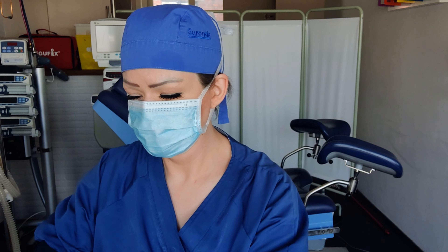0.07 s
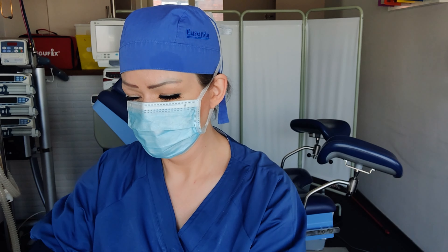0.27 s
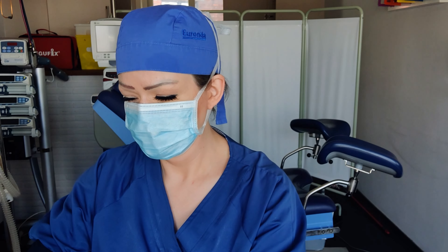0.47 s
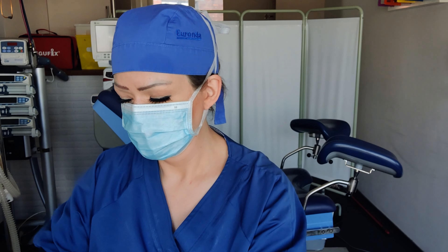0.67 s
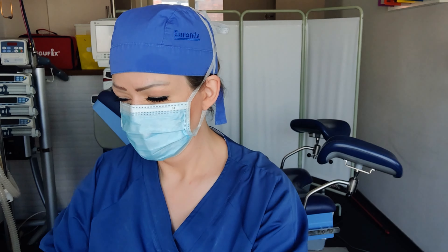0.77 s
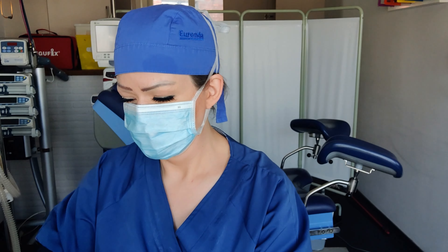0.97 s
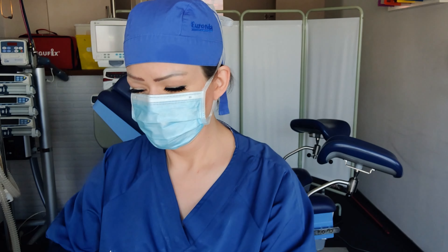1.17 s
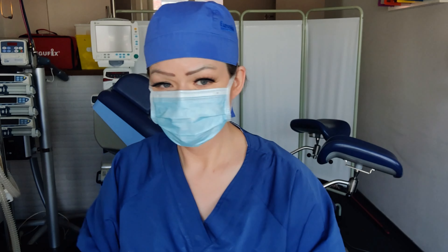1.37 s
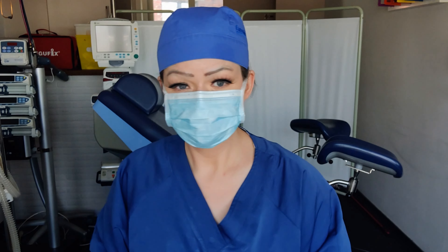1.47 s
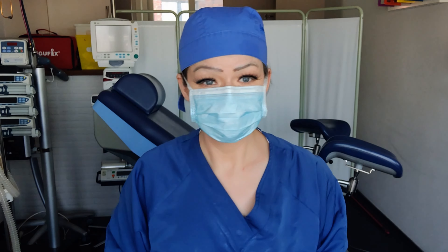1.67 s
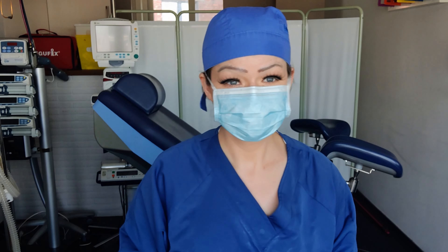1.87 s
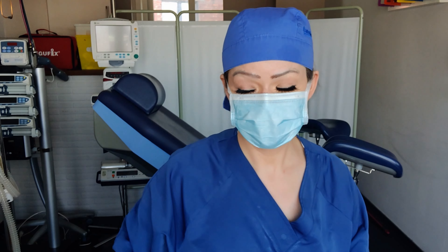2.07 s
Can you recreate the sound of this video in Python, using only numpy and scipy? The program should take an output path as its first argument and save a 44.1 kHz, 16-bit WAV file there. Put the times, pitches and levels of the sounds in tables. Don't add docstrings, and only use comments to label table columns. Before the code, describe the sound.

Crisp wrapper crumpling in dense snapping bursts stops abruptly, leaving faint cloth brushing and low hum

```python
import sys
import numpy as np
from scipy import signal
from scipy.fft import rfft, irfft, next_fast_len
from scipy.io import wavfile
from scipy.ndimage import map_coordinates

SR = 44100
rng = np.random.default_rng(int(sys.argv[2]) if len(sys.argv) > 2 else 0)


def log_audio(samples):
    frames = np.atleast_2d(samples).T
    limited = np.clip(frames, -1, 1)
    pcm = np.round(limited * 32767).astype(np.int16)
    wavfile.write(sys.argv[1], SR, pcm)


def decibels_to_gain(level_db):
    exponent = np.asarray(level_db, float) / 20
    return 10 ** exponent


N = 94109
TIME = np.arange(N) / SR


def unit(x):
    return x / np.sqrt(np.mean(x ** 2) + 1e-20)


def along(points, hz):
    f, v = np.transpose(points)
    return np.interp(np.log(hz + 1), np.log(f + 1), v)


def curves(rows):
    s, *columns = np.transpose(rows)
    return [np.interp(TIME, s, column) for column in columns]


def wobble(rate):
    knots = rng.standard_normal(int(N * rate / SR) + 4)
    return map_coordinates(knots, [np.arange(N) * rate / SR])


def filtered(x, response):
    m = next_fast_len(N + SR // 2)
    return irfft(rfft(x, m) * response(np.fft.rfftfreq(m, 1 / SR)), m)[..., :N]


def causal(x, spectrum):
    gain = np.maximum(decibels_to_gain(along(spectrum, np.fft.rfftfreq(4096, 1 / SR))), 1e-4)
    cepstrum = irfft(np.log(gain))
    cepstrum[1:2048] *= 2
    cepstrum[2049:] = 0
    pulse = irfft(np.exp(rfft(cepstrum)))
    return signal.fftconvolve(x, pulse / np.linalg.norm(pulse))[:N]


def rush(spectrum):
    # f/Hz, correlation/1
    alike = [(60, 0.93), (180, 0.99), (550, 0.35), (1650, 0.21), (4970, 0.16), (15000, 0.14)]

    def mid_and_side(hz):
        turn = np.arccos(np.clip(along(alike, hz), -1, 1)) / 2
        return decibels_to_gain(along(spectrum, hz)) * [np.cos(turn), np.sin(turn)]

    mid, side = filtered(rng.standard_normal((2, N)), mid_and_side)
    return unit(np.array([mid + side, mid - side]))


def spikes(rate, spread_db):
    chance, size, sign = rng.random(N), rng.exponential(size=N), rng.standard_normal(N)
    return unit((chance < rate / SR) * decibels_to_gain(np.minimum(spread_db * size, 9)) * sign)


def background():
    # t/s, level/dB
    rumble = [
        (0.0, -57.5),
        (0.1, -72),
        (0.23, -51.5),
        (0.34, -69),
        (0.36, -51),
        (0.52, -54.5),
        (0.7, -64.5),
        (1.65, -65),
        (1.72, -58.5),
        (2.13, -58),
    ]
    # f/Hz, density/dB per Hz
    lows = [(30, -39.5), (60, -12.5), (97, -10), (242, -3.5), (280, -8), (455, -19), (500, -32.5),
            (650, -55), (1100, -120)]
    # f/Hz, density/dB per Hz
    deep = [(12, -28), (20, -4.5), (45, -3.5), (70, -5.5), (95, -26), (200, -93)]
    # f/Hz, density/dB per Hz
    hiss = [(240, -36.5), (400, -8), (540, -16), (1100, -17), (4200, -28), (9000, -29), (13000, -29),
            (16000, -23.5)]
    # f/Hz, level/dB
    hum_tones = [
        (46, -71),
        (104, -68),
        (243, -72),
    ]
    # t/s, drone level/dB, second hum level/dB
    swell = [(0, -9, -3), (.4, 1, -6), (.47, 2, -8), (.65, 1.5, 2.5), (1.0, 2, 6.5), (1.2, -6, 1.5),
             (1.26, 8.5, 1), (1.42, 7.5, -5.5), (1.5, -6, -2), (1.6, 6.5, 3.5), (1.9, 5, -2), (2.0, -7, -5)]

    rumble_db, = curves(rumble)
    drone_db, second_db = curves(swell)
    sound = decibels_to_gain(rumble_db - 3.5 + 0.83 * wobble(9)) * rush(lows)
    sound += decibels_to_gain(-67 + 0.6 * drone_db) * rush(deep)
    sound += decibels_to_gain(-72.5 + 0.76 * wobble(3.3)) * rush(hiss)
    for (hz, db), swell_db in zip(hum_tones, (drone_db, second_db, 0)):
        phase = 2 * np.pi * hz * TIME + 0.73 * wobble(5.5)
        sound += decibels_to_gain(db + swell_db + 1.7 * wobble(8.02)) * np.sin(phase)
    return sound


def sleeve():
    # t/s, level/dB
    brushing = [(0.8, -79), (0.902, -82), (0.932, -71.5), (1.1, -72.5), (1.144, -87), (1.276, -81.5),
                (1.366, -72.5), (1.46, -72.5), (1.566, -67), (1.57, -66), (1.748, -71), (1.788, -62),
                (1.858, -61.5), (1.952, -69.5), (2.026, -67), (2.052, -66.5), (2.13, -67.5)]
    # f/Hz, density/dB per Hz
    cloth = [(240, -24.5), (400, -20), (620, -4.5), (2400, -9.5), (3300, -18), (6800, -19), (10000, -29.5),
             (16000, -29)]
    # t/s, length/s, level/dB, f/Hz, bandwidth/Hz
    strokes = [
        (1.575, 0.083, -74, 4300, 650),
        (1.4, 0.038, -73.5, 1700, 600),
        (1.796, 0.14, -65, 830, 300),
        (1.6, 0.23, -72, 1750, 410),
        (2, .11, -71, 2280, 160),
        (2.035, 0.043, -71, 2200, 1000),
        (1.282, 0.43, -74, 4900, 6200),
    ]

    brush_db, = curves(brushing)
    u = np.maximum(TIME - 1.574, 0) / 0.0053
    seam = 1 + 1.8 * u * np.exp(-u)
    sound = decibels_to_gain(brush_db + 1.15 * wobble(39.82) - 1.0) * seam * rush(cloth)
    for s, length, db, hz, wide_hz in strokes:
        u = np.maximum(TIME - s, 0) / length
        shape = (1 - np.exp(-u * 8)) * np.exp(-u ** 4)
        noise = rush([(20, 0), (16000, 0.0061)])
        fold = filtered(noise, lambda f: np.exp(-((f - hz) / wide_hz) ** 2))
        sound += decibels_to_gain(db) * shape * unit(fold)
    return sound


def pops():
    # t/s, peak level/dB, f/Hz, decay time t60/s
    bumps = [(.039, -40, 535, 0.068), (.039, -33.5, 1081, 0.043), (.212, -37.5, 646, 0.059),
             (0.231, -45.5, 98.5, 0.1), (.341, -39, 685, 0.043), (.361, -39, 205, 0.047),
             (.363, -36, 702, 0.041), (.41, -47.5, 220, 0.065), (.436, -45, 363, 0.1),
             (.438, -32.5, 1120, 0.071), (.44, -45, 120, 0.1), (.49, -48.5, 238, 0.07),
             (.508, -41.5, 706, 0.024), (.532, -37, 684, 0.057), (0.534, -41, 256, 0.05),
             (.545, -44, 565, 0.041), (.585, -56.5, 520, 0.075), (.66, -57, 394, .1),
             (2.08, -54, 241, 0.18), (1.491, -65, 255, 0.1), (1.671, -56, 200.4, 0.15),
             (1.71, -48.5, 160, 0.17)]
    s, db, hz, t60 = np.transpose(bumps)[..., None]
    since = np.maximum(TIME - s, 0)
    onset = 1 - np.exp(-since / t60 * 12)
    decay = decibels_to_gain(db + 4.5 - 60 * since / t60)
    return np.sum(decay * onset * np.sin(2 * np.pi * hz * since), axis=0)


def wrapper():
    # t/s, effort/dB, flexing of the sheet/dB, ring of the taut film/dB
    crumple = [(0.0, -38, -14, -7.5), (.1, -44.5, -8.5, -11), (0.14, -45, -8, -15.5),
               (0.186, -33, -8, -12.5), (.245, -38, -8, -6.5), (0.29, -44.5, -5.5, -13.5),
               (0.348, -38.5, -4, -5), (.4, -40.5, -4, -9), (0.422, -53, 4, -12), (0.43, -40.5, -6.5, -9.5),
               (0.596, -40.5, -8.5, -13.5), (0.7, -56, -12, -10)]
    # t/s, peak level/dB, thump of the sheet/dB, cluster length/ms, brightness/dB
    snaps = [(0.0238, -33, -18, 1.5, 2), (.0409, -18, -15.5, 2.73, -3), (0.0545, -29, -27.5, 0.82, -5),
             (.077, -36, -24, 2, -2), (0.1138, -23.5, -19.5, 2.1, -3.5), (0.1345, -28.5, -22, 3.3, 4.5),
             (0.1558, -20.5, -18.5, 3, 1), (0.1728, -18, -30, .5, 9), (0.178, -24.5, -31, 2.3, -6),
             (0.187, -19.5, -25.5, 4.1, -4.5), (.2062, -23.5, -18.5, 1.9, 7.5),
             (0.2182, -22, -22.5, 1.1, 8), (0.273, -24, -31.5, 2.2, 0), (0.2776, -21.5, -20, 2.4, -4),
             (0.3137, -20, -31, 1.63, -4.5), (0.326, -28, -33, 1.9, 11), (0.3418, -15.5, -34.5, 2, -5.5),
             (0.3638, -22, -18, 1.2, -3), (0.4321, -14.5, -23, 1.8, -2), (0.4357, -15.5, -23, 2.8, -1.5),
             (0.4392, -17, -18, 3.36, -1.5), (0.444, -22, -22, 6, -2), (.4531, -18.5, -28, 1.6, 4),
             (0.4862, -21, -27, 2, 4.5), (0.507, -21.5, -19.5, 3.6, -0.5), (0.5288, -23, -39, 0.81, 3.5),
             (0.5349, -18, -20, 4.4, -1), (0.584, -18, -21.5, 1.4, -1), (0.6456, -30.5, -18, 1.7, -1)]
    # t/s, peak level/dB, cluster length/ms, brightness/dB
    ticks = [(0.0459, -26, 1.8, -5), (0.059, -31.5, 1.6, 0.5), (.163, -29.5, 3.2, 1), (0.196, -24, 4.2, -3),
             (0.2122, -26, 1.2, -6), (0.221, -27.5, 1.4, -4), (0.226, -29, 1.4, -4.5),
             (.234, -29.5, 3.2, 2), (0.244, -28, 1.7, -1.5), (.285, -32.5, 1.6, -4), (0.31, -39, 1.3, 7),
             (.347, -21.5, 2, -4.5), (0.3513, -26.5, 1.1, 0.5), (0.3734, -27, 1.5, -2),
             (0.376, -28, 1.3, -4.5), (.388, -30.5, 5.5, -3), (.3948, -29, 1, 16), (.4488, -32, 1.5, 1.5),
             (0.4716, -34, 2, 1), (0.514, -25.5, 1.6, 5), (.518, -22.5, 2, 0), (0.543, -27, 4.3, -3.5),
             (0.58, -32, 1.6, -1), (.591, -27.5, 3, -3)]
    # f/Hz, density/dB per Hz
    film_colour = [(500, -35.5), (900, -3.5), (2000, -7), (5000, -2.5), (9000, -7), (13000, -6),
                   (16000, -6.5)]
    # f/Hz, density/dB per Hz
    edge_colour = [(500, -44.5), (1100, -6.5), (2200, 0), (5000, -2.5), (9000, -4), (16000, -5.5)]
    # f/Hz, density/dB per Hz
    taut = [(5600, -35), (6400, -5.5), (7100, 1), (7900, -3), (9000, -36.5)]
    # f/Hz, density/dB per Hz
    crack = [(800, -29.5), (2000, -19.5), (4800, -7), (6200, -5), (8500, -6.5), (11000, -7), (16000, -14.5)]
    # f/Hz, density/dB per Hz
    sizzle = [(4000, -39), (8000, -13.5), (11000, -3.5), (14000, -1.5), (17000, 0.5)]
    # f/Hz, density/dB per Hz
    sheet_colour = [(53, -34.5), (90, -20), (235, -4.5), (500, -3), (900, -2.5), (2200, -5), (4500, -22.5),
                    (8000, -54)]

    effort_db, flex_db, ring_db = curves(crumple)
    effort = decibels_to_gain(effort_db - 276 * np.maximum(TIME - 0.66, 0))

    def crinkle(colour):
        return causal(effort * decibels_to_gain(3.8 * wobble(119.8) - 7.0) * spikes(18000, 2), colour)

    def cluster(shape, grains):
        burst = shape * grains
        return burst * np.linalg.norm(shape) / np.linalg.norm(burst)

    buckles, slaps = spikes(30000, 0.76), spikes(12000, 1.9)
    cracks, thumps = np.zeros((2, N)), np.zeros(N)
    small = [(s, db, -26, ms, bright_db) for s, db, ms, bright_db in ticks]
    for s, db, thump_db, ms, bright_db in list(snaps) + small:
        u = np.maximum(TIME - s, 0) / np.clip(ms / 1000, 0.0004, 0.02)
        shape = (1 - np.exp(-u * 7)) * np.exp(-u * u)
        tilt_db = np.array([[-bright_db / 2], [bright_db / 2]])
        cracks += decibels_to_gain(db - 8.5 + tilt_db) * cluster(shape, buckles)
        thumps += decibels_to_gain(db + thump_db + 4.0) * cluster(shape, slaps)

    film, edges = crinkle(film_colour), crinkle(edge_colour)
    ring = effort * decibels_to_gain(ring_db - 5.5 + 3.3 * wobble(150)) * spikes(5000, 1.9)
    sheet = effort * decibels_to_gain(flex_db + 1.9 * wobble(30) - 4) * spikes(6000, 2.2) + thumps
    paper = film + causal(ring, taut) + causal(sheet, sheet_colour)
    paper += causal(cracks[0], crack) + causal(cracks[1], sizzle)
    return paper, decibels_to_gain(-3.5) * edges


def ports(x):
    # f/Hz, level/dB
    left = [(150, 0.097), (700, 2.7), (3000, 2.1), (14000, .1)]
    lead_s, lead_ends_hz = 0.0003253, 5850
    near_db, near_s = -11, 0.012
    late = near_s * (0.1 + rng.random((2, 7, 1)))
    size = rng.choice([-1, 1], size=(2, 7, 1))

    def response(hz):
        lead = 1j * np.pi * lead_s * np.minimum(hz, lead_ends_hz)
        half = lead + np.log(decibels_to_gain(along(left, hz)))
        arrivals = size * np.exp(-late / near_s - 2j * np.pi * hz * late)
        echoes = 1 + decibels_to_gain(near_db) * np.sum(arrivals, axis=1) * (hz > 1200)
        return np.exp(np.outer([1, -1], half)) * echoes

    return filtered(x, response)


def room(x):
    # f/Hz, t60/s
    walls = [(200, 0.6), (900, 0.46), (2000, 0.65), (4000, 0.57), (8000, 0.42), (15000, 0.19)]
    before = x[SR // 4:0:-1]
    x, wet = np.r_[decibels_to_gain(-1.5) * before, x], 0
    turn = np.arange(len(x)) // int(0.11 * SR) % 4
    for k in range(4):
        noise = rush([(20, 0.0072), (16000, 0.012)])[:, :SR]
        hz, t, z = signal.stft(noise, SR, nperseg=256)
        decay = decibels_to_gain(-60 * t / along(walls, hz)[:, None])
        tail = signal.istft(z * decay, SR, nperseg=256)[1]
        tail = tail / np.linalg.norm(tail[0])
        wet = wet + signal.fftconvolve((x * (turn == k))[None], tail, axes=1)
    return wet[:, len(before) - 400:][:, :N]


def scene():
    paper, edges = wrapper()
    air = pops()
    near = ports(paper + air) + edges * [[1], [-1]]
    reverberant = decibels_to_gain(-3.5) * room(paper + edges + 0.5 * air)
    return near + reverberant + sleeve() + background()


def band_limit(x):
    return signal.sosfilt(signal.butter(12, 16640, fs=SR, output="sos"), x)


def record(dry):
    # f/Hz, level/dB
    capsule = [(4800, 0), (5800, -5.5), (6500, 2), (7100, 4), (7800, 2), (8500, 0.5), (15250, 2.5),
               (15750, -20.5), (16150, -47)]
    mix = filtered(dry, lambda hz: decibels_to_gain(along(capsule, hz)))
    return band_limit(mix)


dry = scene()
out = record(dry)
log_audio(out)
```